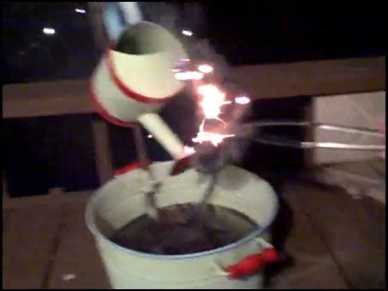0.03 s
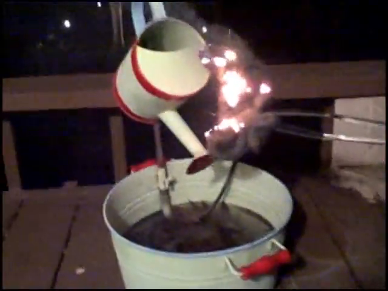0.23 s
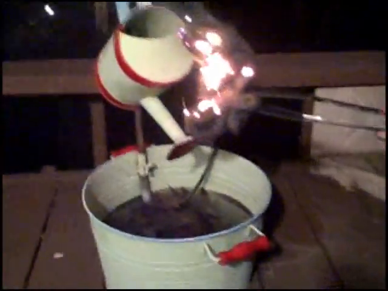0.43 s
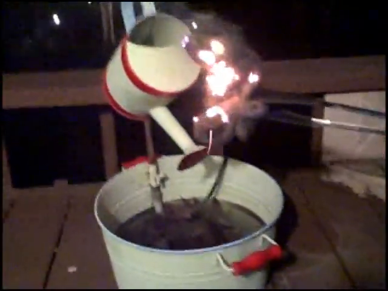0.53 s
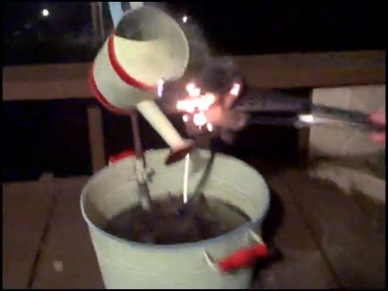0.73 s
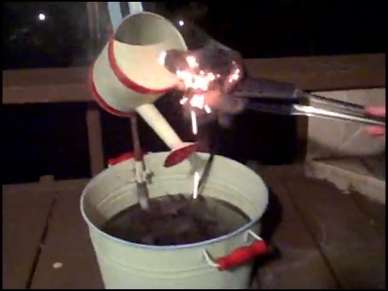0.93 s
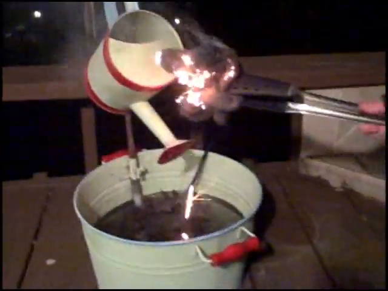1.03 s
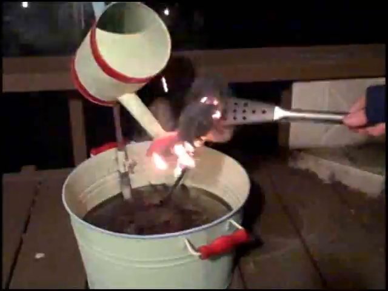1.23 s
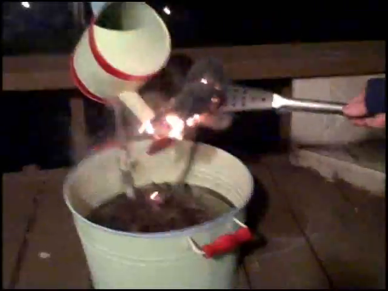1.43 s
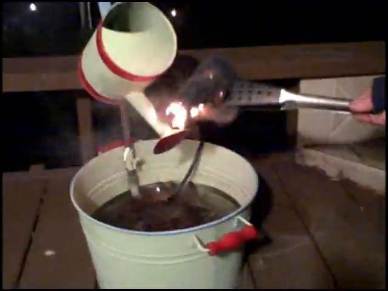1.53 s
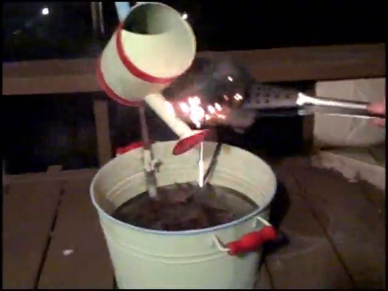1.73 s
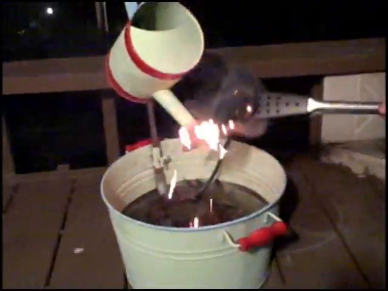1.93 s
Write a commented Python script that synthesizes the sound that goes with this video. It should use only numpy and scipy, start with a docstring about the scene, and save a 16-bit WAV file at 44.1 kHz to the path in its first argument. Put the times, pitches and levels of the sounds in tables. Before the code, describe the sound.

Burning steel wool spits bright, uneven cracks close to the microphone, with a light hiss and soft flame rush. The loudest pops come in the first half, later ones are weaker, over a faint low outdoor rumble.

```python
"""Steel wool burns in tongs over a metal bucket on a wooden deck at night.
From the start: low rumble, wavering hum, faint whine; over them the wool's hiss, flame rush and ticks.
Sharp cracks follow at once, many trailing a few ms of sputter; bucket, deck and railing scatter each
into a short bright tail. The loudest, near 0.2, 0.5 and 1.1 s, overload the microphone.
After 1.2 s the flame rush drops; the last cracks are weak."""
import sys
import numpy as np
from scipy import signal
from scipy.fft import rfft, irfft
from scipy.io import wavfile

SR = 44100
rng = np.random.default_rng(int(sys.argv[2]) if len(sys.argv) > 2 else 0)


def bounce(signal):
    """Save signal as a 16-bit WAV file at the path given by the first command-line argument."""
    frames = np.transpose(np.atleast_2d(signal))
    limited = np.clip(frames, -1, 1)
    pcm = np.round(limited * 32767).astype(np.int16)
    wavfile.write(sys.argv[1], SR, pcm)


N = 88200

# rumble spectrum: f/Hz, level/dB
RUMBLE_SHAPE = [(12, -19.5), (22, 0), (40, 2), (70, -2), (100, -5), (135, -3.5), (190, -11.5), (250, -15.5),
                (375, -22), (520, -30.5), (1100, -40.5), (3000, -45.5), (10000, -58.5)]
# distant hum: f/Hz, width/Hz, level/dB
HUM_TONES = [(73.7, 7, -51), (151.7, 5.34, -48)]
# hum swell: t/s, gain/dB
HUM_SWELL = [(0, -2), (.3, 1), (.58, -2.5), (.78, 2.5), (.88, -1.5), (1.2, 3.5), (1.32, -8.5), (1.44, 2),
             (1.68, 0), (1.85, 4.5), (1.93, -10.5)]
# whine: f/Hz, width/Hz, level/dB
WHINE_TONES = [(7560, 78, -71.5), (8400, 90, -74.5)]
# vigour of the burning, scales hiss and ticks: t/s, gain/dB
VIGOUR = [(0, 3.5), (.35, -4), (.55, -5.5), (.68, -6), (.8, -3), (1.0, -3), (1.2, -0.5), (1.35, -6),
          (1.55, -3.5), (1.7, -8), (2, -7.5)]
# hiss spectrum: f/Hz, level/dB
HISS_SHAPE = [(500, -23), (1500, -18.5), (3500, -13), (4900, -7), (6300, -1.5), (7200, -4), (8000, -14.5),
              (9400, -14.5), (10500, -36)]
# flame rush spectrum: f/Hz, level/dB
FLAME_SHAPE = [(80, -9), (230, 0.5), (450, -5), (900, -17.5), (2000, -32), (6000, -51)]
# flame rush swell: t/s, gain/dB
FLAME_SWELL = [(0, 1), (.4, -1.5), (.85, -3), (1.15, 1.5), (1.35, -10.5), (1.6, -9.5), (2, -11)]
# spectrum of a crack or tick: f/Hz, level/dB
CRACK_SHAPE = [(100, -22.5), (250, -22), (500, -17), (1000, -16.5), (2000, -16.5), (3000, -14.5),
               (4000, -10), (4900, -7.5), (5550, -1.5), (6500, 2), (7250, -3.5), (8050, -12.5),
               (8900, -10.5), (9700, -17), (10600, -36.5)]
# pops: t/s, click level/dB, sputter re click/dB, sputter length/s, low body gain/dB
POP_EVENTS = [ (0.0114, -28, -9, 0.0018, 11), (0.043, -33.5, -7, 0.0025, 5), (0.0787, -16, -12, 0.0023, -5),
              (0.1068, -26.5, -6, .002, 1), (0.1357, -26.5, 2.5, 0.0059, 3), (0.148, -30.5, -2, .002, 7),
              (0.1647, -34, 3, .004, 4), (0.209, -25, -12, 0.0023, -12), (.2196, 1, 9.5, 0.0059, 1.5),
              (.2677, -14, -4.5, 0.0027, 5.5), (0.285, -28, -12, .002, 1), (.3420, -24.5, -2, .002, -4),
              (.3499, -24.5, -14, 0.0022, 1), (.3700, -11, -4, 0.0015, -8), (0.4164, -28.5, 4, 0.0063, 2),
              (.4273, -30, -8, .002, -1), (0.462, -33, -7, .003, 2), (.4646, -24, -22, .002, 7),
              (0.473, 0, -9, 0.0018, -1), (.5285, -16, -5, 0.0025, 3.5), (0.5314, -19, 0, 0.00083, 1),
              (.5796, -20, -7, 0.0015, -13), (0.6224, -25, -8, 0.0035, 2), (0.7204, -30, 1, .002, 4),
              (0.7221, -16.5, -2, 0.0053, 4), (0.7319, -23, 5.5, 0.0056, -3),
              (0.761, -13.5, -12, 0.0022, 4.5), (0.8028, -18.5, -6, 0.0022, -6),
              (.8205, -24.5, 2.5, 0.0061, 3), (.8828, -28, -7, 0.0025, 2), (0.8964, -17, -3.5, 0.0034, 0.5),
              (1.0265, -30, 1, .002, -1), (1.0625, -1, 0.5, 0.0036, 1.5), (1.0631, -2.5, -12, 0.006, 2),
              (1.1190, -20, 5, .008, 0.5), (1.1313, -23.5, -2.5, .004, 0), (1.1484, -20.5, -1.5, 0.0056, 1),
              (1.1723, -37, 9, 0.0055, 3), (1.1823, -23, -3, 0.0044, -2), (1.1864, -13, 2, 0.0018, 9),
              (1.1882, -17.5, 6.5, 0.0022, 4.5), (1.2057, -25, 2, .002, 1), (1.2163, -19.5, 4, 0.0068, -7),
              (1.2483, -31, -8, 0.0022, 9), (1.3150, -32.5, 3.5, 0.0046, 7), (1.3677, -19.5, 9, 0.013, 1.5),
              (1.4392, -30, 4.5, 0.0054, 3), (1.5621, -26.5, 1, 0.0021, -3), (1.5644, -21, 3, 0.0053, -2.5),
              (1.603, -29.5, 6, 0.0059, 0), (1.7293, -28.5, -5.5, 0.0018, 1.5),
              (1.773, -36.5, -16.5, 0.0024, 1.5), (1.813, -41, 2.5, .004, 0), (1.8425, -43, 0, 0.0035, 3),
              (1.8560, -21, -0.5, 0.006, 8), (1.8884, -32, -0.5, 0.0036, -3),
              (1.9370, -40.5, 7, 0.0062, -3.5)]
# scattered sound re direct: f/Hz, gain/dB
SCATTER_SHAPE = [(200, -4), (1000, -2.5), (3000, -2), (5000, -2), (6400, 0), (8000, -1), (10000, -1)]

RUMBLE_DB, HISS_DB, FLAME_DB = -44.5, -57.5, -56
HUM_FLUTTER_DB, HUM_FLUTTER_HZ = 1.5, 9.6
TICKS_PER_S, TICK_DB, TICK_SPREAD_DB = 68, -53, 4
SPUTTER_PER_S, SPUTTER_SPREAD_DB, SPUTTER_DELAY_S = 5000, 2.5, .0003
BODY_EDGE_HZ, CUTOFF_HZ = 1400, 10600


def from_db(db):
    """Decibels to gain."""
    return 10 ** (np.asarray(db) / 20)


def unit_rms(x):
    """Scale to rms 1."""
    return x / np.sqrt(np.mean(x ** 2) + 1e-20)


def unit_energy(x):
    """Scale to the energy of a unit click."""
    return x / np.sqrt(np.sum(x ** 2) + 1e-20)


def envelope(points):
    """Gain per sample from (t/s, gain/dB) points."""
    return from_db(np.interp(np.arange(N) / SR, *np.transpose(points)))


def bin_gains(shape, size):
    """Gain per FFT bin from (f/Hz, level/dB) points."""
    hz, db = np.transpose(shape)
    return from_db(np.interp(np.log(np.fft.rfftfreq(size, 1 / SR) + 1), np.log(hz), db))


def response(shape, size=2048):
    """Minimum-phase impulse response of a spectrum."""
    cepstrum = irfft(np.log(bin_gains(shape, size)))
    cepstrum[1:size // 2] *= 2
    cepstrum[size // 2 + 1:] = 0
    return irfft(np.exp(rfft(cepstrum)))


def convolve(x, impulse):
    """Convolution cut to N samples."""
    return signal.fftconvolve(x, impulse)[:N]


def noise(shape):
    """Coloured noise, rms 1."""
    return unit_rms(irfft(rfft(rng.standard_normal(N)) * bin_gains(shape, N), N))


def drift(rate_hz):
    """Random wander, rms 1."""
    hz = np.fft.rfftfreq(N, 1 / SR)
    lowpass = (hz > 0) / (1 + (hz / rate_hz) ** 2)
    return unit_rms(irfft(rfft(rng.standard_normal(N)) * lowpass, N))


def wavering_tone(hz, width_hz):
    """Sine with randomly wandering pitch."""
    pitch_hz = hz + width_hz / 2 * drift(width_hz)
    return np.sin(2 * np.pi * np.cumsum(pitch_hz) / SR)


def rumble():
    """Steady low outdoor noise."""
    return from_db(RUMBLE_DB) * noise(RUMBLE_SHAPE)


def hum():
    """Two distant low tones, wavering in pitch and level."""
    tones = np.zeros(N)
    for hz, width_hz, db in HUM_TONES:
        tone = wavering_tone(hz, width_hz)
        flutter = from_db(HUM_FLUTTER_DB * drift(HUM_FLUTTER_HZ))
        tones += from_db(db) * unit_rms(tone * flutter)
    return envelope(HUM_SWELL) * tones


def whine():
    """Two faint high tones at steady level."""
    return sum(from_db(db) * unit_rms(wavering_tone(hz, width_hz)) for hz, width_hz, db in WHINE_TONES)


def hiss():
    """Bright noise of the glowing wool; follows its vigour."""
    return from_db(HISS_DB) * envelope(VIGOUR) * noise(HISS_SHAPE)


def flame():
    """Soft low rush of the flame."""
    return from_db(FLAME_DB) * envelope(FLAME_SWELL) * noise(FLAME_SHAPE)


def ticks():
    """Tiny sparks snap at random: one impulse each."""
    sizes = from_db(TICK_DB + TICK_SPREAD_DB * np.minimum(rng.exponential(1, N), 3))
    fires = rng.random(N) < TICKS_PER_S / SR
    return envelope(VIGOUR) * fires * rng.choice([-1, 1], N) * sizes


def pops(size=2048):
    """One click plus a run of smaller bursts per pop. Returns impulses and low body gain."""
    clicks, body_gain = np.zeros(N + SR), np.ones(N)
    t = np.arange(size) / SR
    for onset_s, click_db, sputter_db, sputter_s, body_db in POP_EVENTS:
        sizes = rng.choice([-1, 1], size) * from_db(SPUTTER_SPREAD_DB * rng.standard_normal(size))
        fires = rng.random(size) < SPUTTER_PER_S / SR
        fade = (t > SPUTTER_DELAY_S) * np.exp(-(t / sputter_s) ** 2)
        pop = from_db(sputter_db) * unit_energy(fires * sizes * fade)
        pop[0] += 1  # leading click
        start = int(onset_s * SR)
        clicks[start:start + size] += from_db(click_db) * pop
        body_gain[start:] = from_db(body_db)  # held until the next pop
    return clicks[:N], body_gain


def reflections(clicks, gain_db, t60_s, delay_s):
    """Diffuse echo: each click's energy returns after a delay as decaying noise."""
    t = np.arange(SR // 2) / SR
    decay = unit_energy((t > delay_s) * np.exp(-np.log(1000) * t / t60_s))
    power = np.abs(convolve(clicks ** 2, decay ** 2))
    return from_db(gain_db) * np.sqrt(power) * rng.standard_normal(N)


def burning_wool():
    """Hiss and flame under ticks and echoing pops, both coloured as cracks."""
    clicks, body_gain = pops()
    near = reflections(clicks, gain_db=-7, t60_s=.07, delay_s=.0016)  # bucket, deck
    far = reflections(clicks, gain_db=-27, t60_s=.49, delay_s=.018)  # railing, walls
    clicks += convolve(near + far, response(SCATTER_SHAPE))
    lows = signal.lfilter(*signal.butter(1, BODY_EDGE_HZ, fs=SR), clicks)
    clicks += (body_gain - 1) * lows  # low shelf
    crack = response(CRACK_SHAPE)
    crack /= np.abs(crack).max()
    return hiss() + flame() + convolve(ticks() + clicks, crack)


def scene():
    """Burning wool over the night background, mono."""
    return (burning_wool() + hum() + whine() + rumble())[None]


def record(dry):
    """Microphone overload soft-clips the loudest pops; a steep low-pass follows."""
    lowpass = signal.ellip(10, .2, 80, CUTOFF_HZ, fs=SR, output="sos")
    return signal.sosfilt(lowpass, np.tanh(dry))


dry = scene()
out = record(dry)
bounce(out)
```